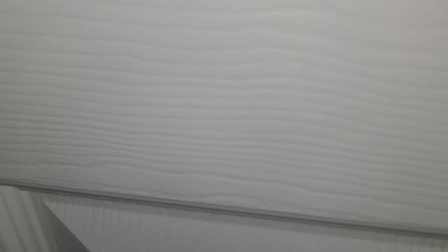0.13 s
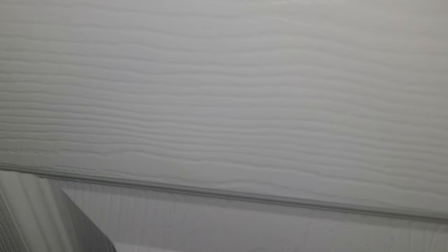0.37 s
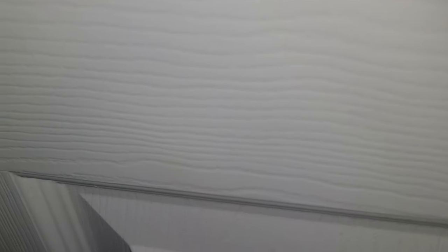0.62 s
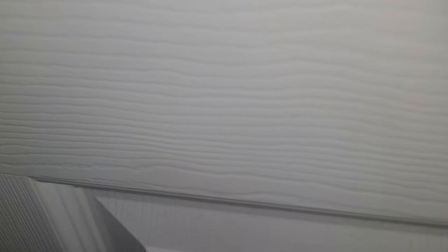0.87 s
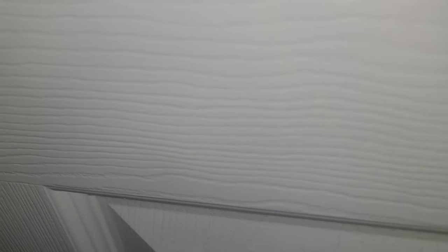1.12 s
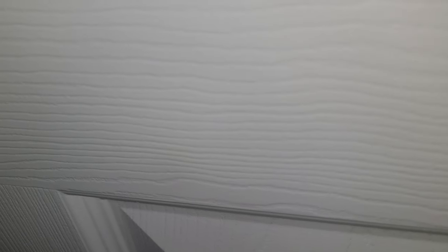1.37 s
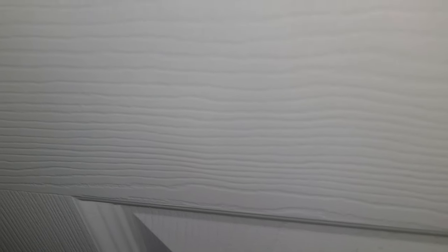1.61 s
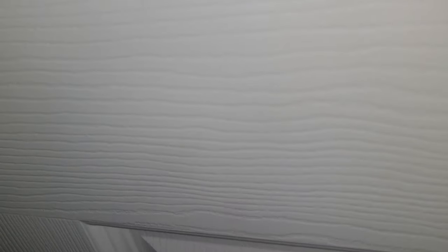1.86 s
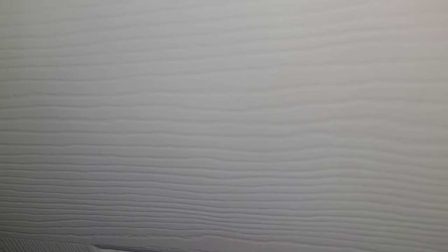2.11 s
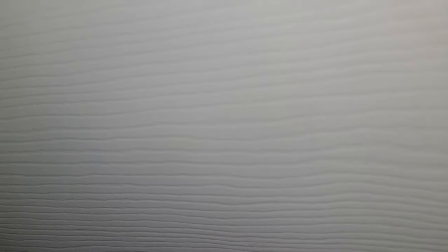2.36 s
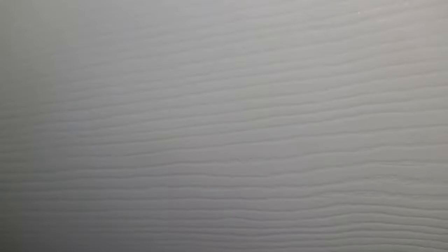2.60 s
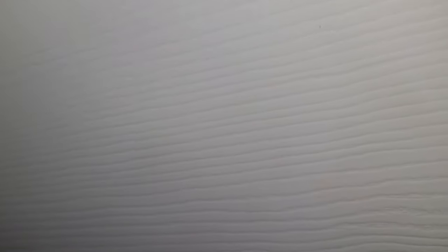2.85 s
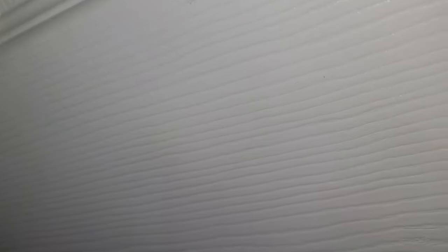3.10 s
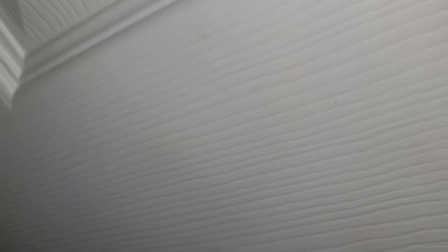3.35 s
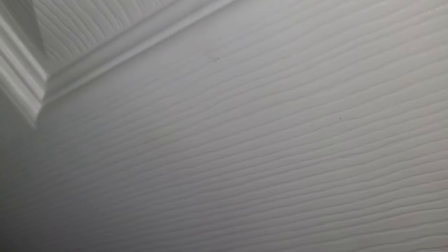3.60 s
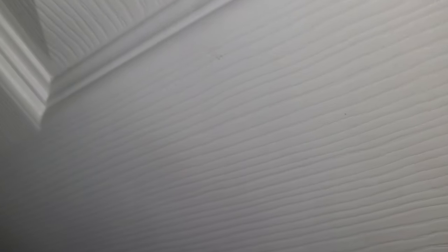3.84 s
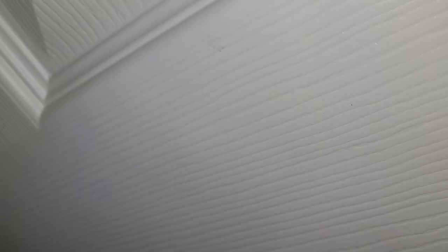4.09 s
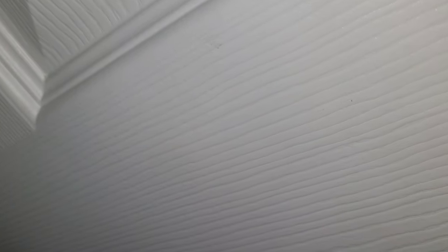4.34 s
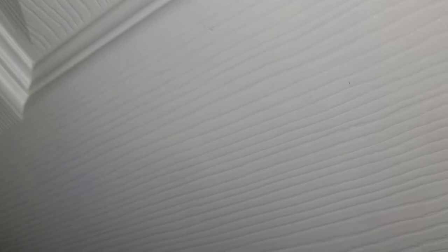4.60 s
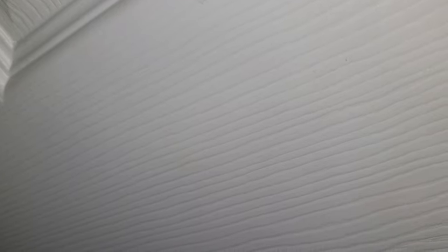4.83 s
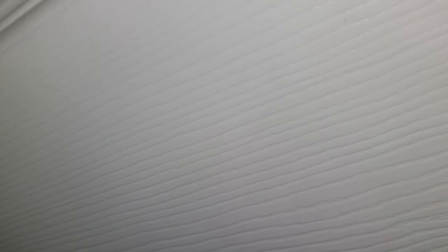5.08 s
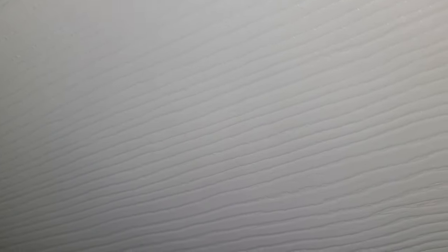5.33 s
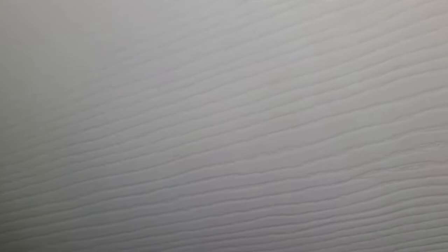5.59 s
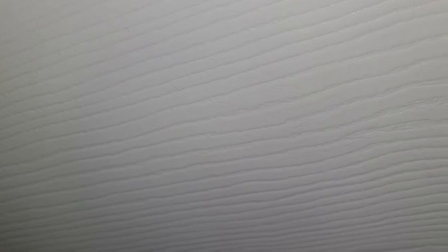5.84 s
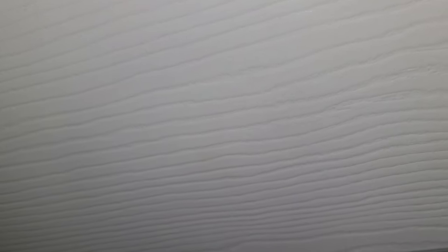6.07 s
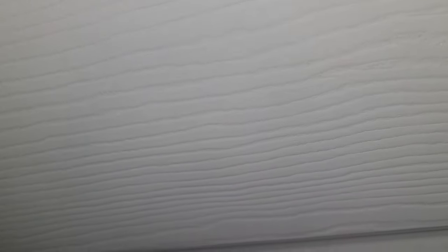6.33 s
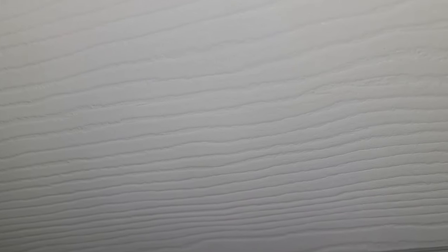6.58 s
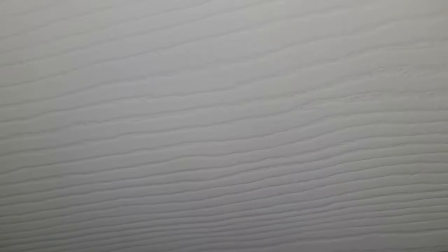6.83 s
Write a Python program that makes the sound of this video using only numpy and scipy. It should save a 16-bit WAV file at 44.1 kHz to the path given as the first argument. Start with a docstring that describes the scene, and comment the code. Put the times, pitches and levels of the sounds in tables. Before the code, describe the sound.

A hand works a door knob beside a stereo microphone indoors. The latch bolt cracks loudly against the hollow door, then the knob slips, scrapes and clicks quietly. Past the middle the latch snaps and bounces again, followed by a lull, a small bright snap on the left, a low wooden knock and final light clicks with a brief soft hiss. Quiet house hum and uneven rumble continue throughout the short-echoed small room.

```python
"""A door knob is gripped, turned and released close to a hand-held pair of microphones.
House hum, rumble and room tone lie under all. Early on the latch bolt snaps through the hollow door
and a spring squeaks faintly; the knob then slips and rubs in short bursts and clicks in its housing.
Past the middle the latch snaps and rebounds again, then come dull panel knocks and a thin snap on the
left; near the end a soft hiss swells at both ports, slightly louder on the left. A small room answers."""
import sys
import numpy as np
from scipy import signal
from scipy.fft import rfft, irfft, next_fast_len
from scipy.io import wavfile
from scipy.ndimage import uniform_filter1d

SR = 44100
rng = np.random.default_rng(int(sys.argv[2]) if len(sys.argv) > 2 else 0)


def generate_wav(signal):
    """Clip the signal to [-1, 1] and save it as 16-bit WAV at the path in sys.argv[1]."""
    frames = np.transpose(np.atleast_2d(signal))
    scaled = np.clip(frames, -1, 1) * 32767
    pcm = np.round(scaled).astype(np.int16)
    wavfile.write(sys.argv[1], SR, pcm)


def level_to_linear(level):
    """Convert decibel levels to linear amplitude factors, elementwise."""
    exponent = np.asarray(level, float) / 20
    return 10 ** exponent


N = 306495

# Modes of door and latch together. Each row: frequency in Hz, relative level in dB,
# free ring time in seconds (to fall 60 dB), which each blow caps and shortens.
DOOR_MODES = [(98, -9, 0.6), (183, -14, 0.3), (357.8, 0, 0.12), (466, 1.5, 0.31), (694, -2, 0.14),
              (796, 1.5, 0.39), (1040, -5.5, 0.15), (1297, 1, .12), (1577, -8.5, 0.04), (1800, -0.5, .11),
              (2010, 3, .1), (2386, -11, .09), (2836, -12, 0.21), (2970, -4.5, 0.18), (4080, -0.5, .06),
              (4540, -18.5, 0.033), (5200, -19.5, .12), (6185, -10, 0.043), (6360, -9, 0.07),
              (6500, -11, 0.023), (7200, -27, .14), (8660, -15, 0.05), (9800, -34, 0.15),
              (13113, -21.5, .07)]
# The knob slips a little way round. Each row: start in seconds, length in seconds,
# ringing level in dB, scraping level in dB, centre of the scrape in Hz; levels are ahead of the ports.
KNOB_SLIPS = [(0.418, .05, -83.5, -65, 2190), (0.564, .11, -80, -74.5, 2190),
              (0.773, .02, -92, -74.5, 2354), (1.085, 0.0574, -91, -80, 2120),
              (1.164, 0.0095, -74, -65.5, 1900), (1.204, 0.056, -96.5, -73.5, 1994),
              (1.524, 0.0379, -79.5, -71, 1990), (2.063, 0.054, -86.5, -80, 1994),
              (2.183, 0.046, -84.5, -80, 2260), (2.28, 0.037, -74.5, -72, 1800),
              (2.337, 0.071, -86.5, -76, 2230), (2.478, 0.051, -88, -68, 1900),
              (2.549, 0.021, -74, -71.5, 2220), (2.613, 0.046, -71, -66, 1735),
              (2.695, 0.026, -71.5, -73, 1870), (2.904, 0.064, -75.5, -71.5, 1710),
              (3.003, 0.079, -88, -78, 1820), (3.093, 0.071, -73.5, -65, 1907),
              (3.25, 0.032, -69.5, -68, 1800), (3.3, 0.084, -77, -69.5, 1820),
              (3.543, 0.079, -74, -71.5, 1750), (4.541, 0.17, -81, -89, 2310),
              (4.71, 0.044, -76.5, -89.5, 2040), (4.8, 0.058, -89, -91.5, 2000),
              (4.915, 0.077, -83.5, -90.5, 1930), (5, 0.15, -92, -91.5, 1900),
              (5.417, 0.03, -83, -74.5, 1684), (5.527, .08, -87, -77.5, 1506),
              (5.603, .1, -78.5, -71.5, 1465), (5.714, 0.146, -84.5, -75.5, 1880),
              (5.983, 0.054, -89, -81, 1916), (6.056, 0.0777, -78.5, -74, 1800),
              (6.302, 0.065, -82.5, -86, 2150), (6.343, 0.0284, -76, -63, 2240),
              (6.626, 0.024, -95, -72.5, 2240)]


def even(x):
    """Scales to rms 1."""
    return x / np.sqrt(np.mean(x ** 2) + 1e-20)


def read(points, hz):
    """Reads a spectrum on a log-frequency axis."""
    f, value = np.transpose(points)
    return np.interp(np.log(hz + 1), np.log(f + 1), value)


def colour(x, points):
    """Filters by a dB spectrum."""
    hz = np.fft.rfftfreq(len(x), 1 / SR)
    return irfft(rfft(x) * level_to_linear(read(points, hz)), len(x))


def resonate(x, hz, width):
    """Resonance of a given width in Hz: shifts hz down to zero, smooths and shifts back."""
    turn = np.exp(2j * np.pi * np.cumsum(hz * np.ones(len(x))) / SR)
    r = np.exp(-np.pi * width / SR)
    return 2 * (turn * signal.lfilter([1 - r], [1, -r], x / turn)).real


def band(hz, width):
    """Narrow noise: white noise through the same resonance twice, at rms 1."""
    return even(resonate(resonate(rng.standard_normal(N), hz, width), hz, width))


def level(table, column):
    """Turns one dB column into a gain curve, all but silent outside the table's times."""
    t, db, rows = np.arange(N) / SR, np.full(N, -140.), np.array(table)
    inside = (t >= rows[0, 0]) & (t <= rows[-1, 0])
    db[inside] = np.interp(t[inside], rows[:, 0], rows[:, column])
    return uniform_filter1d(level_to_linear(db), size=200)


def left_port(hz):
    """Phase by which the left port leads the shared room tone at each frequency."""
    # Each row: frequency in Hz, lead in radians.
    port_turn = [(0, 0.17), (220, 0.18), (420, 0.43), (1400, 3.4), (3000, 2.6), (8500, 0.77), (13000, 0.13)]
    return np.exp(1j * read(port_turn, hz))


def room_tone():
    """Random short-time spectra in faint drifting patches, partly shared by both ports."""
    # Spectrum of the air. Each row: frequency in Hz, relative level in dB per Hz.
    air = [(15, -43.5), (25, -12), (49, -7), (70, -6), (87, -28), (117, -4), (153, -11), (212, -12),
           (326, -11.5), (384, -8), (734, -22), (818, -26), (5280, -46.5), (6210, -58), (16000, -63)]
    # Each row: frequency in Hz, left-right likeness from 0 to 1.
    air_same = [(60, 0.79), (150, 0.45), (300, 0.45), (450, 0.23), (750, 0.53), (1400, 0.62), (4000, 0.57),
                (6000, 0.071), (15000, .02)]
    # Each row: frequency in Hz, left minus right in dB.
    air_lean = [(60, 2), (180, -1), (550, -3.5), (1650, -5), (4970, -11), (15000, -0.5)]
    frames, hz = N // 512 + 5, np.fft.rfftfreq(2048, 1 / SR)
    a, b, c, d, patches = rng.standard_normal((frames, 1025, 5)).T
    patches = uniform_filter1d(patches, size=20, axis=0)  # smooth over frequency
    patches = even(uniform_filter1d(patches, size=8, axis=1))  # and over time
    same = np.clip(read(air_same, hz), -1, 1)[:, None]
    right = a + 1j * b
    left = same * left_port(hz)[:, None] * right + np.sqrt(1 - same ** 2) * (c + 1j * d)
    lean_db = read(air_lean, hz) / 2
    lean_db = np.array([lean_db, -lean_db])[:, :, None]
    z = np.array([left, right]) * level_to_linear(lean_db + read(air, hz)[:, None] + 1.7 * patches)
    air_db = -54.5
    return level_to_linear(air_db) * even(signal.istft(z, nperseg=2048, noverlap=1536)[1][:, :N])


def hum():
    """Narrow wavering tones of the house, alike at both ports."""
    # Each row: frequency in Hz, width in Hz, level in dB ahead of the port balance.
    hum_tones = [(58.6, 5, -63.5), (119, 8, -63), (207.5, 21, -70), (364.5, 41, -67)]
    return sum(level_to_linear(db) * band(hz, width) for hz, width, db in hum_tones)


def rumble():
    """Low noise bands that swell and sink, only partly shared by the ports."""
    # Each row: time in seconds, gain in dB for the summed bands.
    rumble_swell = [(0, -61.5), (.7, -68), (1.1, -59), (2.1, -66.5), (2.37, -57), (2.6, -59.5), (4.1, -64),
                    (4.75, -55.5), (5.3, -63), (6.6, -60), (6.95, -59)]
    own = np.array([band(77, 60), band(60, 40)])
    return level(rumble_swell, column=1) * (band(62, 45) + 1.8 * own)


def hiss():
    """Smooth broadband noise, a little weaker at the top, unrelated at the two ports."""
    # Each row: time in seconds, level in dB ahead of the port gains.
    hiss_swell = [(6.42, -86), (6.53, -84), (6.64, -76), (6.78, -87.5), (6.95, -85)]
    # Each row: frequency in Hz, relative level in dB per Hz.
    hiss_tone = [(4000, -2), (6500, -4.5), (9500, -1), (12000, -8), (15500, -5.5)]
    noise = np.array([colour(side, hiss_tone) for side in rng.standard_normal((2, N))])
    return level(hiss_swell, column=1) * even(noise) * level_to_linear(np.array([[4], [2.5]]))


def squeak():
    """Two thin, fluttering tones of the spring as the latch settles: noise in narrow resonances."""
    # Each row: time in seconds, lower tone in Hz, its level in dB, upper tone's level in dB;
    # levels are ahead of the ports.
    spring = [(0.49, 4710, -118, -99), (0.516, 4639, -71.5, -61), (0.566, 4565, -68, -73),
              (0.596, 4564, -58, -76), (0.608, 4550, -61, -84), (0.645, 4519, -54.5, -81),
              (0.682, 4525, -66.5, -104), (0.83, 4493, -85.5, -107)]
    s, hz = np.transpose(spring)[:2]
    noise = rng.standard_normal((2, N))
    lower_hz = np.interp(np.arange(N) / SR, s, hz)
    lower = even(resonate(noise[0], lower_hz, width=20))
    upper = even(resonate(noise[1], 11530, width=40))
    return level(spring, column=2) * lower + level(spring, column=3) * upper


def slips(column):
    """Gain of all slips for one dB column: quick rise, hold, exponential fade."""
    rise_s, fade_s = 0.023, 0.017  # length of the straight rise, time constant of the fade
    t, power = np.arange(N) / SR, np.zeros(N)
    for row in KNOB_SLIPS:
        since = t - row[0]
        rise = np.clip(since / rise_s + .5, 0, 1)  # halfway up at the start time
        fade = np.exp(-np.maximum(since - row[1], 0) / fade_s)
        power += (level_to_linear(row[column]) * rise * fade) ** 2
    return np.sqrt(power)


def rubbing():
    """Fine grit of the turning knob: scraping noise with a moving centre, and a thin metal ring."""
    # The knob rings when rubbed. Each row: frequency in Hz, width in Hz, relative level in dB.
    knob_rings = [(8700, 17, -1), (13170, 90, -17.5), (6630, 75, -27.5)]
    # The shaft colours the scrape. Each row: frequency in Hz, width in Hz, relative level in dB.
    shaft_rings = [(3220, 124, -10), (3830, 99, -12.5), (5530, 250, -9), (6400, 67, -24.5)]
    # Spectrum of the scrape. Each row: frequency in Hz, relative level in dB per Hz.
    scrape_tone = [(500, -8), (900, 12), (1400, 1), (2000, 1), (3200, -8.5), (5500, -16), (7000, -18),
                   (10000, -65), (14000, -38.5), (16000, -31)]
    grain_db = 2.2 * np.repeat(rng.exponential(1, N // 64 + 1), 64)[:N]
    grit = rng.standard_normal(N) * level_to_linear(uniform_filter1d(grain_db, size=64))

    ring = sum(level_to_linear(db) * even(resonate(grit, hz, width)) for hz, width, db in knob_rings)
    catch_db = 4.5 * even(uniform_filter1d(rng.standard_normal(N), size=900))
    ring *= level_to_linear(catch_db)  # the contact catches and lets go

    shaft = sum(level_to_linear(db) * even(resonate(grit, hz, width)) for hz, width, db in shaft_rings)
    start, length, _, _, centre_hz = np.transpose(KNOB_SLIPS)
    centre_hz = np.interp(np.arange(N) / SR, start + length / 2, centre_hz)
    centre = even(resonate(resonate(grit, centre_hz, 300), centre_hz, 300))
    scrape = even(even(colour(grit, scrape_tone)) + .45 * centre + 0.61 * shaft)
    pressure_db = 4.2 * even(uniform_filter1d(rng.standard_normal(N), size=500))  # wavers
    return slips(column=2) * ring + slips(column=3) * level_to_linear(pressure_db) * scrape


def blows(table, body, air_db, corner_hz, ping_db, ring, thud_db):
    """Each blow: a noise burst with a sharp contact, a ping of the struck spot, then the body's ring."""
    # Spectrum of the first contact. Each row: frequency in Hz, relative level in dB per Hz.
    crack = [(60, -20), (300, 0), (800, 0), (1900, -6), (3100, -3.5), (4500, -12), (6600, -4.5),
             (7800, -18), (9000, -13), (11500, -26), (14200, -20), (16000, -35.5)]
    out, lead = np.zeros(N), 1024  # samples ahead of the contact
    t = (np.arange(6144) - lead) / SR
    after = np.maximum(t, 0)
    # each mode is a close group of five, which beat into a rough, dense ring
    hz, mode_db, t60 = np.repeat(np.transpose(body), repeats=5, axis=1)[:, :, None]
    spread_hz = np.minimum(.07 * hz, 120)
    damped_s = .8 * ring * np.minimum(t60, .22)  # the hand damps every mode
    rise = 1 - np.exp(-after / .0003)
    soft_edge = .16 * np.exp(-(t / .009) ** 2)
    snap_s = .0012 * ring
    sharp = after / snap_s * np.exp(1 - after / snap_s)
    contact = soft_edge + rise * (sharp + .1 * np.exp(-after / (0.0072 * ring)))
    thud = level_to_linear(thud_db) * np.sin(2 * np.pi * 80 * after) * np.exp(-after / .03)  # the whole leaf jolts
    for s, middle_db, panel_db, metal_db, spot_hz in table:
        chance, noise = rng.standard_normal((len(hz), 3)), rng.standard_normal(len(t))
        uneven_db = 2.5 * chance[:, :1]
        mode_hz = hz + spread_hz * chance[:, 1:2]
        modes = np.sin(2 * np.pi * mode_hz * t + 3 * chance[:, 2:])
        modes = (level_to_linear(mode_db + uneven_db - 60 * after / damped_s) * modes).sum(0)
        ping = np.sin(2 * np.pi * spot_hz * after) * np.exp(-after / (0.00045 + 0.9 / spot_hz))
        sound = even(colour(noise, crack)) * contact
        sound += level_to_linear(-20.5) * rise * modes + level_to_linear(ping_db) * ping + thud
        sound *= signal.windows.tukey(len(t), .05)
        sound = colour(sound, [(550, panel_db), (1150, middle_db), (corner_hz, middle_db),
                               (2.0 * corner_hz, metal_db), (9200, metal_db),
                               (12000, metal_db + air_db)])
        # the struck spot sets the colour
        sound = colour(sound, [(spot_hz / 1.2, -2.5), (spot_hz, 1.5), (spot_hz * 1.8, -2.5)])
        part = out[round(s * SR) - lead:][:len(t)]
        part += sound[:len(part)]
    return out


def edge_snap():
    """A thin bright snap: one short, treble-heavy blow on the door modes."""
    # Each row: time in seconds, middle, low panel and bright metal gains in dB, struck spot in Hz.
    snap_blows = [(4.6443, -66, -58.5, -41.5, 6070)]
    return blows(snap_blows, DOOR_MODES, air_db=10.5, corner_hz=2440, ping_db=5.0, ring=.4, thud_db=-15)


def knocks():
    """Dull knocks on the door panel: blows with little treble and a low struck spot."""
    # Each row: time in seconds, middle, low panel and bright metal gains in dB, struck spot in Hz.
    knock_blows = [(4.6004, -53.5, -50.5, -63, 251), (5.7406, -40, -32.5, -64.5, 327),
                   (5.7559, -59, -49, -74, 261)]
    return blows(knock_blows, DOOR_MODES, air_db=-10, corner_hz=1900, ping_db=5, ring=.8, thud_db=-20)


def clicks():
    """The knob clicks in its housing: blows that ring the knob's own modes."""
    # Each row: time in seconds, middle, low panel and bright metal gains in dB, struck spot in Hz.
    click_blows = [(1.1, -72.5, -53, -69, 2014), (1.134, -69, -48, -71, 1690),
                   (1.3003, -49.5, -30, -70.5, 3786), (1.4349, -63, -52.5, -79, 2680),
                   (1.5274, -59, -50.5, -57, 6530), (2.2915, -65, -36, -67, 1660),
                   (2.6326, -53.5, -42.5, -60.5, 3970), (2.6542, -71, -51.5, -71, 6500),
                   (2.7388, -63, -47, -80, 1630), (3.1392, -34.5, -41.5, -33.5, 4450),
                   (3.3816, -55, -52.5, -65.5, 1286), (3.6126, -42.5, -33.5, -48.5, 1620),
                   (3.6515, -44, -51.5, -37.5, 8800), (4.5534, -80.5, -62.5, -78.5, 5930),
                   (5.954, -66, -58, -79, 1776), (6.1242, -65, -52.5, -72, 1290),
                   (6.347, -57, -50.5, -68, 5600), (6.3564, -55.5, -53, -78, 4140),
                   (6.3674, -57.5, -44.5, -72, 2270), (6.6346, -62.5, -56, -69.5, 2210)]
    # The knob when struck. Each row: frequency in Hz, relative level in dB,
    # free ring time in seconds (to fall 60 dB), which each blow caps and shortens.
    knob_modes = [(670, -14, .12), (950, -18, .12), (1830, -1, .03), (2020, -8, .05), (2790, -12, .08),
                  (3150, -12, .08), (3900, -12, .06), (4870, -14, .04), (5500, -10, .05), (6900, -15, .045),
                  (8690, 9, .07), (10290, -24, .05), (13020, -8, .04)]
    return blows(click_blows, knob_modes, air_db=1.0, corner_hz=3350, ping_db=6.5, ring=0.97, thud_db=-31)


def latch():
    """The latch bolt snaps and rebounds: strong blows that ring door and latch together."""
    # Each row: time in seconds, middle, low panel and bright metal gains in dB, struck spot in Hz.
    latch_blows = [(0.2034, -59, -55.5, -71.5, 930), (0.3143, -19, -25.5, -18, 6480),
                   (0.3166, -14.5, -18.5, -18, 3408), (0.329, -33, -36, -40.5, 961),
                   (0.3555, -45.5, -48.5, -48, 2040), (0.3879, -40, -49, -40.5, 6150),
                   (0.401, -46.5, -51.5, -61, 1940), (0.4698, -61, -59, -57.5, 6400),
                   (0.59, -61, -44, -64, 2965), (0.6847, -63, -45, -70, 2950),
                   (3.6506, -22.5, -23.5, -32.5, 1800), (3.699, -36.5, -34.5, -51, 763),
                   (3.716, -45.5, -51, -69.5, 2720), (3.7244, -49, -55, -55, 1800),
                   (3.8305, -50, -52, -62, 965), (4.0978, -30.5, -28.5, -43, 2990),
                   (4.1082, -33, -37, -44.5, 900)]
    return blows(latch_blows, DOOR_MODES, air_db=-3.5, corner_hz=3300, ping_db=3.5, ring=.8, thud_db=-18)


def room(x):
    """Sparse taps of random sign, each band dying at its own speed, other taps for each port."""
    # Each row: frequency in Hz, time in seconds to fall 60 dB.
    room_decay = [(100, 0.95), (400, 0.51), (1000, 0.17), (3000, 0.14), (7000, 0.195), (15000, .12)]
    taps = np.zeros((2, SR // 2))
    at = np.arange(200, SR // 2 - 20, 20) + rng.integers(0, 20, (2, (SR // 2 - 201) // 20))
    np.put_along_axis(taps, at, rng.choice([-1., 1.], at.shape), 1)
    hz, t, z = signal.stft(taps, SR, nperseg=256)
    fading = z * level_to_linear(-60 * t / read(room_decay, hz)[:, None])
    tail = signal.istft(fading, SR, nperseg=256)[1]
    return signal.fftconvolve(x[None], tail / np.linalg.norm(tail[0]), axes=1)[:, :N]


def ports(left, right):
    """The left port hears near sounds with its own phase and colour, partly scattered over a few ms."""
    # Each row: frequency in Hz, radians by which the left port's direct path leads.
    near_turn = [(0, 1.5), (200, 1.5), (450, 3.5), (1000, 3), (1900, 1.65), (3500, 2.7), (6000, 1.36),
                 (12000, 1.8)]
    # Each row: frequency in Hz, gain in dB that colours the left port.
    port_lean = [(100, -4), (500, 6), (1500, 5), (4000, -1), (12000, 0.84)]
    # What comes round the hand to the left port. Each row: frequency in Hz, share in dB.
    hand_scatter = [(700, -16.5), (2000, -9), (4000, -1), (12000, 0)]
    size = next_fast_len(N)
    hz = np.fft.rfftfreq(size, 1 / SR)
    t = np.arange(400) / SR
    scatter = rng.standard_normal(len(t)) * np.exp(-t / .002)
    scatter = rfft(scatter / np.linalg.norm(scatter), size) * level_to_linear(read(hand_scatter, hz))
    path = np.exp(1j * read(near_turn, hz)) + scatter
    left = irfft(rfft(left, size) * level_to_linear(read(port_lean, hz)) * path, size)[:N]
    return np.array([left, right])


def scene():
    """Door sounds near the right port, one snap near the left, their room, and the background."""
    low = (hum() + rumble()) * level_to_linear(np.array([[-2.2], [1.8]]))
    background = room_tone() + low + hiss()
    door = squeak() + rubbing() + knocks() + clicks() + latch()
    snap = edge_snap()
    snap_left = level_to_linear(7) * snap
    snap_right = level_to_linear(-1) * np.roll(snap, round(.00075 * SR))  # reaches the right port later
    near = ports(level_to_linear(-4.0) * door + snap_left, level_to_linear(6.5) * door + snap_right)
    answer = level_to_linear(np.array([[-12], [-10]])) * room(door + snap)
    return near + answer + background


def low_pass(x):
    """Removes everything above the highest recorded frequency."""
    return signal.sosfilt(signal.butter(12, 16290, fs=SR, output="sos"), x)


def record(dry):
    """Soft clipping rounds off the loudest peaks near full scale."""
    clipped = dry / (1 + dry ** 6) ** (1 / 6)
    return low_pass(clipped)


dry = scene()
out = record(dry)
generate_wav(out)
```